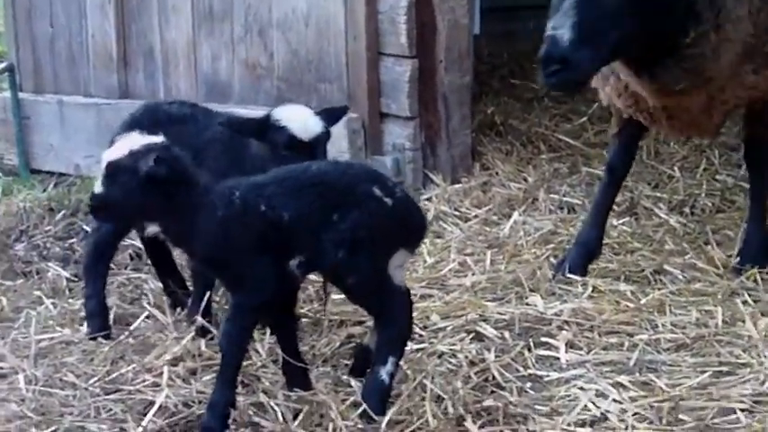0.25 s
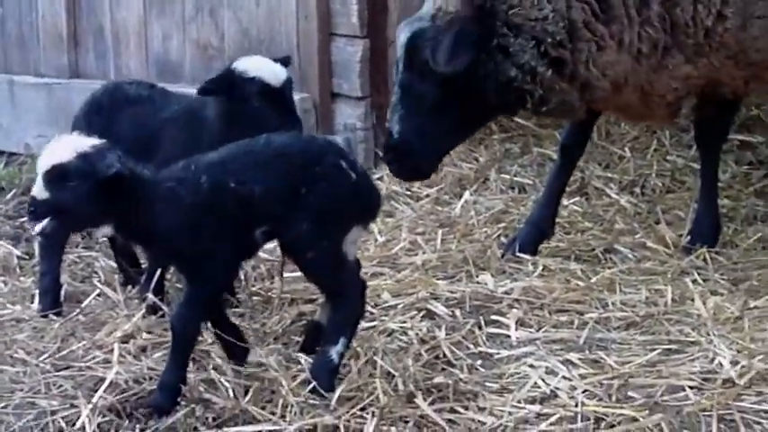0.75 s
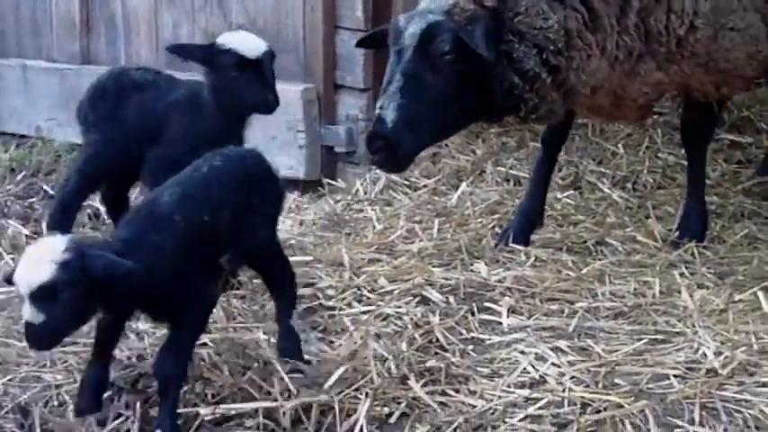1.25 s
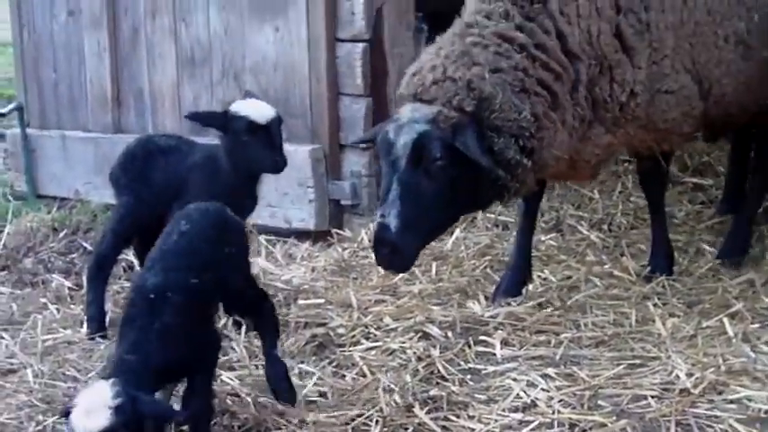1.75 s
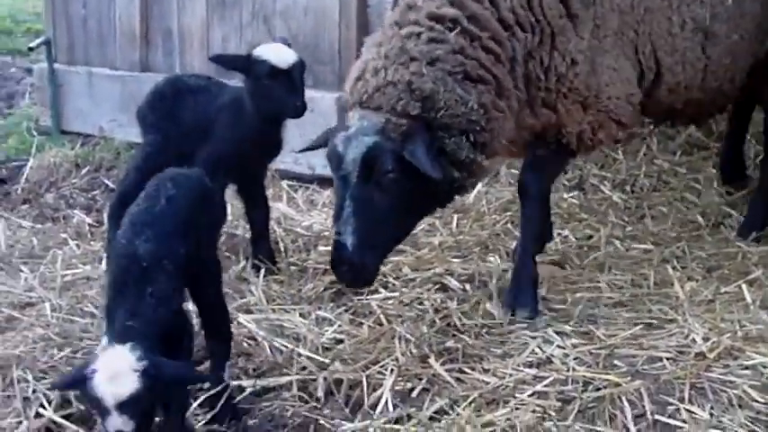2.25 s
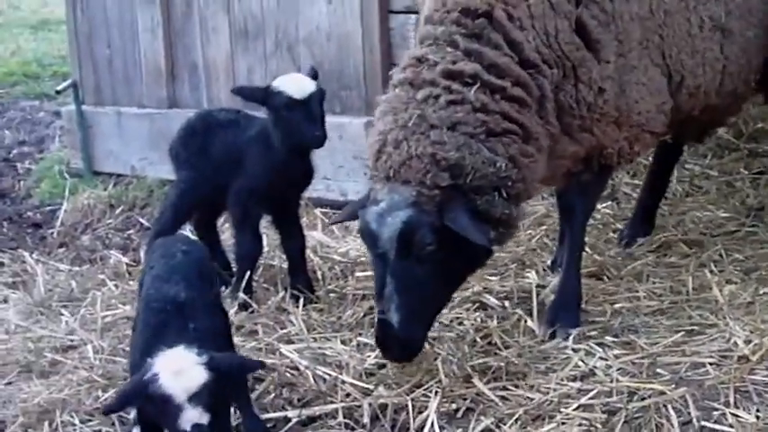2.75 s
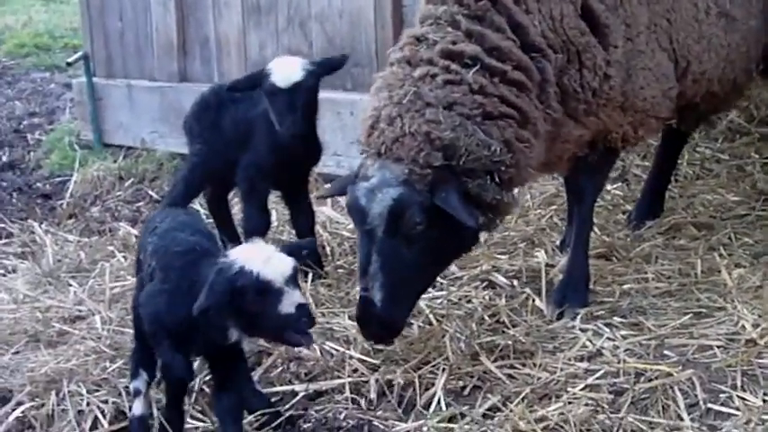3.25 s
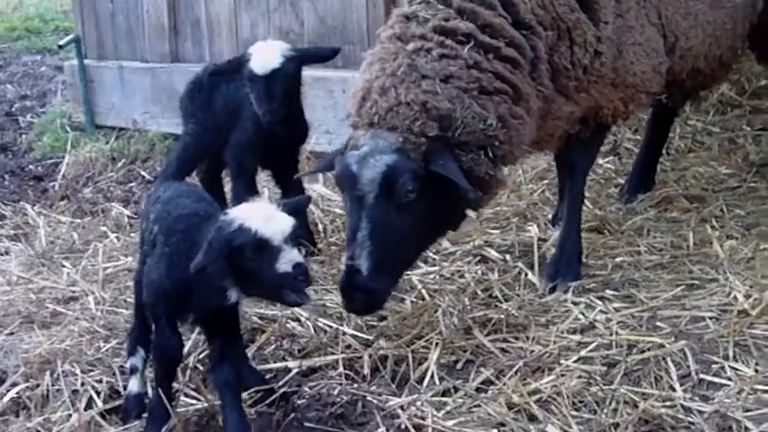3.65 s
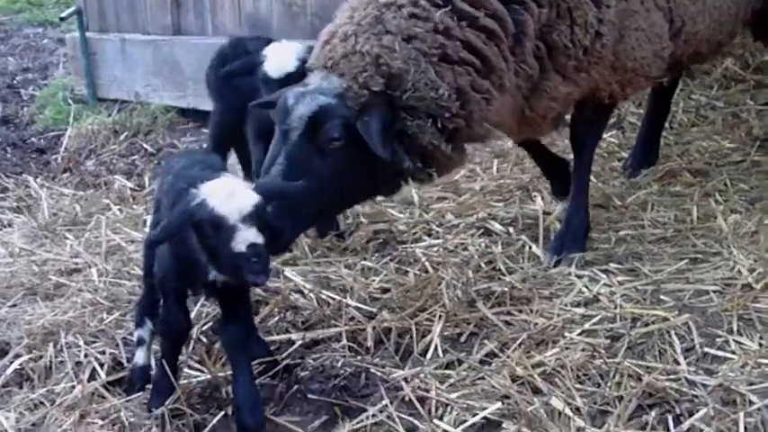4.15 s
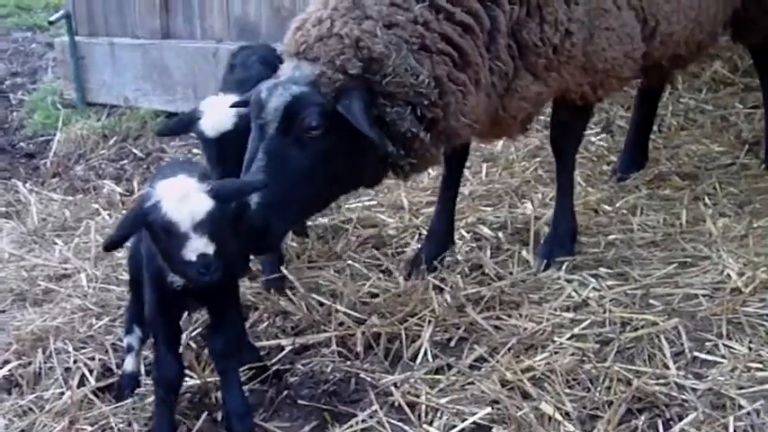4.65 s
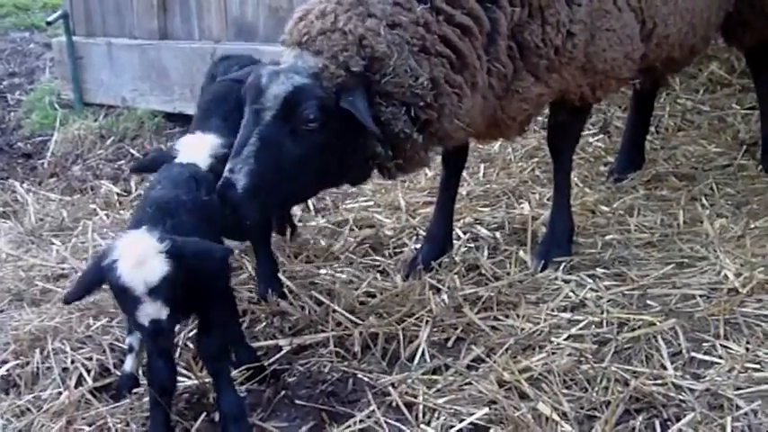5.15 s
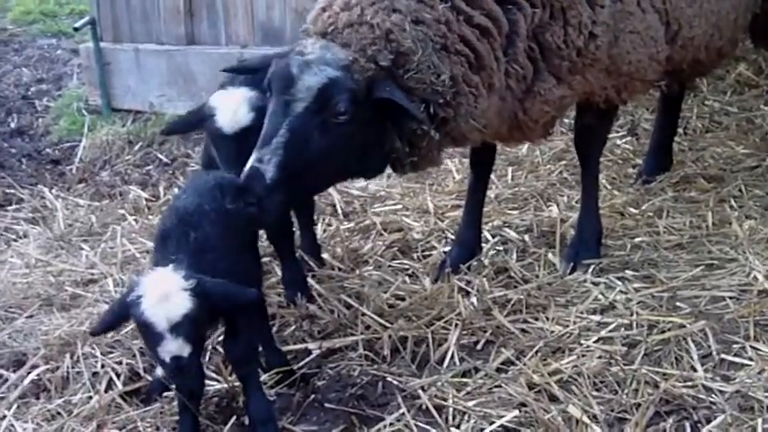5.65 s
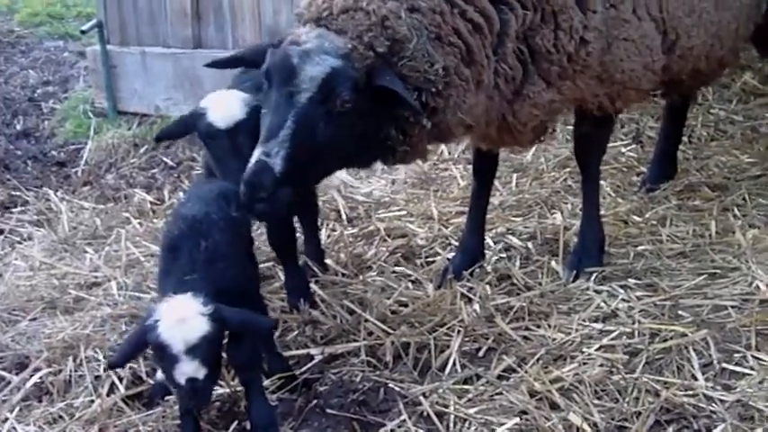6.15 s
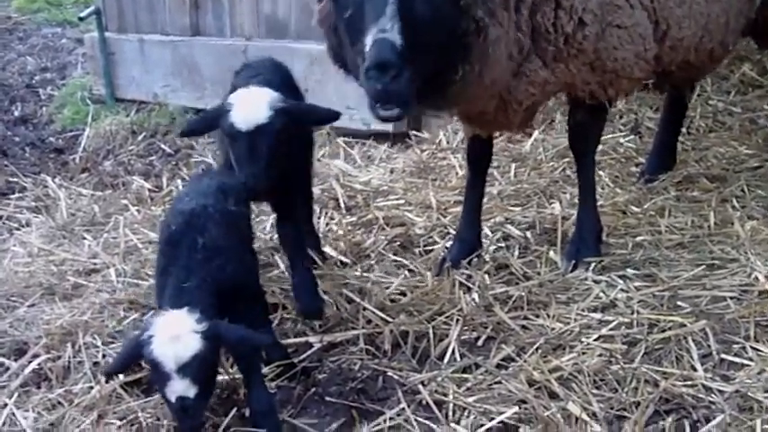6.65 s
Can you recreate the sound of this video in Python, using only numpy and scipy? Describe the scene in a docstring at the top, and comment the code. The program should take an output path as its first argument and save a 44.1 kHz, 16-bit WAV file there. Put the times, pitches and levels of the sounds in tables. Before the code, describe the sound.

A quiet open-air straw yard, heard close up, with faint air noise and low wind rumbling on the microphone. From about 0.2 s a small bird farther off sings, very faint at first, then clearer from 1.1 s: a high whistle followed by a rapid buzz, repeated until about 2.75 s and again from 3.7 to 4.5 s. At 0.6 s a lamb gives a short, soft, nasal bleat, ending near 1.05 s; the ewe answers at once with a low, fluttering, closed-mouth rumble until 1.65 s. Hooves rustle and snap straw from 0.95 to 2.5 s. At 2.7 s the lamb bleats loudly, high and bright, weakening and sagging until 4.15 s. A wind gust swells near 3.2 s, and dull hoof knocks fall around 3.4 and 3.7 s. The ewe rumbles briefly at 3.9-4.25 s. Until nearly 7 s, straw crackles, sharp stalk snaps, especially around 5.5 and 6.2 s, and faint bumps continue.

```python
"""Lamb and ewe in a straw yard

A newborn lamb bleats twice by a barn door, short then long: summed overtones shaped by the opening mouth.
The ewe answers each with a closed-mouth rumble, fluttering pulses through resonances of nose and throat.
A small bird repeats a two-note song, a whistle and then a buzz made by fast pitch warble.
Hooves rustle, snap and knock as coloured noise and clicks; light wind rumbles on the microphone."""
import sys
import numpy as np
from scipy import signal
from scipy.fft import rfft, irfft
from scipy.io import wavfile
from scipy.ndimage import uniform_filter1d, map_coordinates

SR = 44100
rng = np.random.default_rng(int(sys.argv[2]) if len(sys.argv) > 2 else 0)


def to_wav(sig):
    """Store sig (one row per channel, or 1-D mono) as 16-bit WAV at the path in sys.argv[1].

    Samples outside -1..1 are clipped; the rate is SR.
    """
    pcm = np.clip(np.atleast_2d(sig), -1, 1) * 32767
    pcm = np.round(pcm).astype(np.int16)
    wavfile.write(sys.argv[1], SR, pcm.T)  # frames by channels


N = 304290
TIME = np.arange(N) / SR


def amp(db):
    """Decibels to gain."""
    return 10 ** (np.asarray(db) / 20)


def evened(x):
    """Scales to an rms of one."""
    return x / np.sqrt(np.mean(x ** 2) + 1e-20)


def read(points, hz):
    """Reads a spectrum on a log-frequency axis."""
    f, value = np.transpose(points)
    return np.interp(np.log(hz + 1), np.log(f + 1), value)


def curves(rows, t):
    """Reads every column of a table at the times t."""
    s, *columns = np.transpose(rows)
    return [np.interp(t, s, c) for c in columns]


def add(mix, s, sound):
    """Mixes a sound in at time s."""
    part = mix[max(round(s * SR), 0):][:len(sound)]
    part += sound[:len(part)]


def colour(x, points):
    """Gives a signal a spectrum, at rms one."""
    size = x.shape[-1]
    gain = amp(read(points, np.fft.rfftfreq(size, 1 / SR)))
    return evened(irfft(rfft(x) * gain, size))


def drift(t, rate):
    """Smooth chance that turns about rate times a second."""
    knots = rng.standard_normal(4096)
    return map_coordinates(knots, [(t - t[0]) * rate], order=2, mode="wrap")


def resonate(x, hz, width_hz):
    """A resonance passed twice, for steep skirts."""
    b, a = signal.iirpeak(hz, hz / width_hz, SR)
    return signal.lfilter(b, a, signal.lfilter(b, a, x))


def bleat(pitch, effort, start, end, scoop, swell_db, swell_s, jitter, rasp_db, fizz_db,
          waver=0.0015, shimmer=0.045, fade_db=4.5):
    """Clean overtones of the vocal folds in an opening throat, with a little air puffed at each cycle."""
    # Throat colour at three mouth openings. Each row: frequency in Hz, level in dB.
    half_open = [(460, -26.5), (930, -12.5), (1400, -5), (1850, -7.5), (2330, -26.5), (2800, -12),
                 (3750, -8.5), (4200, -10), (5550, -11.5), (6100, -21.5), (7000, -12), (7600, -30),
                 (10600, -36.5), (12200, -38), (15000, -47)]
    fully_open = [(470, -27), (940, -9.5), (1420, 5), (1880, -6.5), (2350, 1), (2830, -25), (3300, -6),
                  (3800, -3), (4900, -6), (6100, -17.5), (7000, -20.5), (8000, -26.5), (12000, -33),
                  (15000, -43)]
    wide_open = [(500, -35), (1010, -25), (1510, 1), (2020, -27), (2520, -14), (3030, -10.5), (3520, -4),
                 (4040, -19.5), (4540, -5.5), (5500, -14.5), (6100, -25.5), (7000, -24), (7700, -33.5),
                 (9300, -28.5), (15000, -46)]
    # Mouth opening. Each row: time in seconds, pose (0 half open, 1 open, 2 wide open).
    mouth_poses = [(0.68, 0.19), (0.82, 0.5), (1.05, 0.12), (2.7, 1.02), (2.88, 2.0), (3.25, 1.82),
                   (3.32, 1.3), (3.5, 0.93), (4.15, 1.04)]
    scoop_s = 0.042  # time constant of the slide up to pitch
    let_go_s, drop_share, drop_db = 0.012, 0.14, 12.5  # pitch and level lost as the call is cut off

    t = np.arange(start, end, 1 / SR)
    held_hz, = curves(pitch, t)
    mouth, = curves(mouth_poses, t)
    held_db, ring_db, edge_db = curves(effort, t)

    # the voice scoops up and swells, holds, then drops
    let_go = np.exp((t - end) / let_go_s)
    hz = held_hz * (1 - scoop * np.exp((start - t) / scoop_s) - drop_share * let_go)
    body_db = held_db - swell_db * np.exp((start - t) / swell_s) - drop_db * let_go

    # the folds are unsteady as they start and stop
    loose = 1 + 7 * np.exp(-(t - t[0]) / 0.05) + 9 * np.exp(-(t[-1] - t) / 0.019)
    unsteady_hz = hz * (1 + waver * drift(t, 70) + jitter * loose * drift(t, 260))
    turns = np.cumsum(unsteady_hz) / SR

    shares = [np.maximum(1 - abs(np.clip(mouth, 0, 2) - pose), 0) for pose in range(3)]
    throats = (half_open, fully_open, wide_open)
    # three registers: body, ring of the upper throat, sharp edge
    waves, powers = np.zeros((2, 3, len(t)))
    for k in np.arange(1, 36):
        f = k * hz
        db = sum(share * read(throat, f) for share, throat in zip(shares, throats))
        # the high overtones swell and fade as the head moves
        gain = amp(db + fade_db * np.minimum(f / 5500, 1) ** 1.2 * drift(t, 18))
        # each throat resonance holds back the overtones above it
        lag = sum(np.arctan((f - centre_hz) / 220) for centre_hz in (1450, 2420, 3780, 4700))
        above_body = np.clip((f - 2550) / 200, 0, 1)
        above_ring = np.clip((f - 5900) / 600, 0, 1)
        register = np.array([1 - above_body, above_body - above_ring, above_ring])
        waves += register * gain * np.cos(2 * np.pi * k * turns - lag)
        powers += register * gain ** 2 / 2
    levels = amp([body_db, body_db + ring_db, body_db + edge_db])
    voice = (levels * waves / np.sqrt(powers)).sum(0) * (1 + shimmer * drift(t, 43))

    # air hisses through the upper throat and fizzes at the lips
    puffs = rng.standard_normal(len(t)) * (0.4 + np.exp(-(turns % 1) / 0.3))
    rasp_colour = [(1500, -26.5), (3000, -22.5), (4300, 6), (5400, -1.0), (6500, -17)]
    fizz_colour = [(3000, -31.5), (6500, 0.0), (9000, -7.5), (12000, -8), (15000, -23.0)]
    rasp = amp(rasp_db) * levels[1] * colour(puffs, rasp_colour)
    fizz = amp(fizz_db) * levels[2] * colour(puffs, fizz_colour)
    call = voice + np.sqrt(loose) * (rasp + fizz)
    return start, call * signal.windows.tukey(len(t), 0.011 / (end - start))


def bleats():
    """The lamb's voice: a short bleat turned away, then a long one facing the microphone."""
    # Pitch held: a low arch, then held and sagging. Each row: time in seconds, pitch in Hz.
    short_pitch = [(0.74, 470.7), (0.842, 467), (0.928, 457.4), (1.02, 425.6)]
    long_pitch = [(2.85, 502), (3.106, 506.4), (3.246, 501.6), (3.308, 486.5), (3.48, 475.3),
                  (3.526, 484.2), (3.582, 466.9), (3.702, 471.6), (3.736, 464.3), (3.842, 469),
                  (3.99, 456.8), (4.11, 452.7)]
    # Effort held. Each row: time in seconds, body level in dB, ring of the upper throat in dB over body,
    # sharp edge in dB over body.
    short_hold = [(0.67, -39.5, -1, -20), (0.746, -39, 9.5, -8.5), (0.844, -35.5, 4.5, -9),
                  (0.91, -38, 9, -12), (1.02, -37, 1.5, -11.5)]
    long_hold = [(2.85, -18.5, 2.5, -13.5), (2.936, -18, 4.5, -15.5), (3.046, -18, -1.5, -16.5),
                 (3.238, -17.5, 0.5, -21), (3.292, -21, -1.5, -18.5), (3.386, -26, 5.5, -14),
                 (3.498, -26, 3.5, -11.5), (3.53, -23.5, 0.5, -18), (3.554, -26, 4.5, -13),
                 (3.74, -25.5, 2, -13.5), (4.11, -30.5, 6, -10.5)]
    # Each row: start and end in seconds, scoop from below as a share of pitch, swell in dB,
    # swell time constant in seconds, base jitter as a share of pitch, base rasp in dB over ring,
    # base fizz in dB over edge.
    calls = [(0.597, 1.052, 0.21, 26.5, 0.025, 0.0021, -24, -11),
             (2.708, 4.155, .23, 32, 0.054, .0008, -33, -21.5)]
    out = np.zeros(N)
    for pitch, effort, row in zip((short_pitch, long_pitch), (short_hold, long_hold), calls):
        add(out, *bleat(pitch, effort, *row))
    return out


def rumble(start, end, first_hz, last_hz, hum_db, swell_db, swell_s, rasp_db, jitter=0.06, breathy=0.058):
    """Fluttering pulses hum in the ewe's nose and rasp in her throat; the flutter smooths out."""
    # Resonances. Each row: frequency in Hz, width in Hz, gain in dB.
    nose = [(190.6, 71, 14.5), (340, 320, -8.5), (593, 53, -12)]
    ewe_throat = [(1047, 390, 14), (1265, 360, 14), (1440, 88, 13), (2210, 121, -43)]
    # Flutter depth at the start and at the end, as a share: deep, then nearly smooth.
    flutter_depths = (0.93, .25)
    flutter_per_s, slowing_per_s2 = 42, 12.5  # first rate, and the rate lost each second

    t = np.arange(start, end, 1 / SR)
    age = t - start
    u = age / (end - start)
    hz = first_hz + (last_hz - first_hz) * u
    level_db = hum_db - swell_db * np.maximum(1 - age / swell_s, 0)
    depth = np.interp(u, [0, 1], flutter_depths)
    turns = np.cumsum(hz * (1 + jitter * (0.25 + depth) * drift(t, 150))) / SR
    flutter_rate = (flutter_per_s - slowing_per_s2 * age) * (1 + 0.042 * drift(t, 16.7))
    flutter = depth * np.cos(2 * np.pi * np.cumsum(flutter_rate) / SR)
    pulses = np.diff(np.floor(turns), prepend=0)
    air = breathy * (0.78 + depth) * np.exp(-(turns % 1) / 0.58) * rng.standard_normal(len(t))
    # the flutter chops both the hum and the rasp
    hum_source = (pulses + air) * (1 + flutter)
    rasp_source = (pulses + 2 * air) * (1 + flutter)
    hum = evened(sum(amp(db) * resonate(hum_source, f, w) for f, w, db in nose))
    rasp = evened(sum(amp(db) * resonate(rasp_source, f, w) for f, w, db in ewe_throat))
    return start, amp(level_db) * (hum + amp(rasp_db) * rasp) * signal.windows.tukey(len(t), 0.1)


def rumbles():
    """The ewe's low calls: one follows the short bleat, one overlaps the end of the long bleat."""
    # Each row: start and end in seconds, first and last pitch in Hz, nasal hum in dB, swell in dB,
    # swell time in seconds, throat rasp in dB over hum.
    calls = [(1.054, 1.658, 167.5, 124.5, -39.5, 13.5, 0.23, -9),
             (3.901, 4.249, 120.1, 151.6, -38.5, 16, 0.24, -8.5)]
    out = np.zeros(N)
    for row in calls:
        add(out, *rumble(*row))
    return out


def note(length_s, pitch, swing_hz, softness, buzz_hz=228, tremble=0.38, unsteady=0.05):
    """One bird note along a pitch shape; a wide fast warble, widening as it swells, makes it a buzz."""
    t = np.arange(0, length_s, 1 / SR)
    u = t / length_s
    arch = np.sin(np.pi * u ** 0.9).clip(0) ** softness
    hz = pitch(u) + (20 + 0.22 * swing_hz) * drift(t, 110)
    warble = arch * np.sin(2 * np.pi * np.cumsum(buzz_hz * (1 + unsteady * drift(t, 54))) / SR)
    tone = np.sin(2 * np.pi * np.cumsum(hz + swing_hz * warble) / SR)
    return np.sqrt(2) * arch * (1 + tremble * drift(t, 83)) * tone


def bird():
    """Whistles that dip in pitch take turns with rising buzzes, each led in by a falling chip."""
    # Each row: start in seconds, mid pitch in Hz, glide from start to end in Hz, level in dB.
    whistles = [(0.19, 3580, 222, -63.5), (1.075, 5460, -130, -48.5), (1.52, 5470, -66, -46),
                (1.976, 5400, -34, -39.5), (2.445, 5430, -10, -47), (3.71, 5480, -100, -39),
                (4.156, 5390, -220, -46.5)]
    # Each row: start in seconds, mid pitch in Hz, level in dB.
    buzzes = [(0.375, 4340, -62.5), (1.27, 4240, -43.5), (1.713, 4280, -41), (2.172, 4245, -43),
              (2.635, 4210, -41.5), (3.89, 4235, -43), (4.338, 4265, -42)]
    whistle_s, dip_hz = 0.122, 129.8  # the pitch sags this far in the middle
    buzz_s, buzz_rise_hz, buzz_swing_hz = 0.116, 80, 205
    chip_hz, chip_fall_hz, chip_s = 6000, 170, 0.02
    chip_lead_s, chip_db = 0.009, -15.5  # ahead of its buzz; level over the buzz
    out = np.zeros(N)
    for s, hz, glide_hz, db in whistles:
        whistle = note(whistle_s, lambda u: hz + glide_hz * (u - 0.5) + dip_hz * (2 * u - 1) ** 2,
                       swing_hz=12, softness=0.46)
        add(out, s, amp(db) * whistle)
    for s, hz, db in buzzes:
        chip = note(chip_s, lambda u: chip_hz - chip_fall_hz * (u - 0.5), swing_hz=90, softness=0.6)
        add(out, s - chip_lead_s, amp(db + chip_db) * chip)
        buzz = note(buzz_s, lambda u: hz + buzz_rise_hz * (u - 0.5), buzz_swing_hz, softness=0.6)
        add(out, s, amp(db) * buzz)
    return out


def crackle(size, per_s, spread_db, hiss):
    """Tiny clicks of very unequal size over the hiss of stalks sliding."""
    struck = rng.random(size) < per_s / SR
    sizes = amp(spread_db * np.minimum(rng.exponential(1, size), 4))
    clicks = struck * sizes * rng.choice([-1, 1], size)
    return evened(evened(clicks) + hiss * rng.standard_normal(size))


def stir():
    """How hard hooves stir the straw: each step builds quickly and dies away."""
    # Each row: peak time in seconds, relative level in dB, time constant of the decay in seconds.
    hoof_steps = [(0.0, -62, 0.042), (0.95, -56, .15), (1.3, -53, 0.17), (1.63, -56, 0.13),
                  (1.85, -56, 0.064), (2.07, -59, 0.086), (2.27, -51.5, 0.2), (2.47, -62.5, 0.073),
                  (4.22, -59.5, 0.16), (4.48, -57, .05), (5.13, -60.5, .12), (5.32, -58.5, .06),
                  (5.62, -56.5, 0.16), (6.42, -60.5, 0.19)]
    rise_s, idle_db = 0.066, -74.5  # a hoof sinks in; the straw never quite rests
    power = amp(idle_db) ** 2
    for s, db, fade_s in hoof_steps:
        age = TIME - s
        fall = np.where(age < 0, (age / rise_s) ** 2, age / fade_s)
        power = power + (amp(db) * np.exp(-fall)) ** 2
    return np.sqrt(power)


def rustle(trim_db=3.5):
    """Clumps of crackle under the hooves."""
    # Each row: frequency in Hz, level in dB.
    straw_colour = [(290, -41.5), (500, -13.5), (1030, -15.5), (2160, -8.5), (3380, -6.5), (4380, -9.5),
                    (4770, -7.5), (9370, -7.5), (11800, -9.5), (15500, -17.5)]
    clumps_db = 1.9 * drift(TIME, 55)
    return colour(crackle(N, 2200, 2.8, 0.85), straw_colour) * stir() * amp(trim_db + clumps_db)


def snaps(trim_db=-7, crack=0.68):
    """A stalk that breaks cracks, then splinters."""
    # Each row: time in seconds, relative peak in dB, relative 1-4 kHz share in dB, crackle length in seconds.
    breaks = [(0.562, -48, -14, 0.017), (1.166, -42, -18.5, 0.027), (1.185, -37.5, -15, 0.03),
              (1.247, -46, -13, .025), (1.85, -41, -21, 0.14), (2.085, -42, -16, 0.037),
              (4.505, -35.5, -14.5, 0.014), (4.995, -48, -10.5, .04), (5.356, -42.5, -17, .04),
              (5.471, -37, -18.5, 0.11), (5.588, -37, -9.5, 0.03), (5.984, -46.5, -28, 0.019),
              (6.187, -41.5, -13.5, 0.053), (6.235, -32.5, -15, 0.08), (6.41, -41.5, -17, 0.046),
              (6.715, -48.5, -1.5, 0.038)]
    lead = 256  # samples of silence ahead of the crack
    out, t = np.zeros(N), np.arange(8192) / SR
    for s, db, low_db, length_s in breaks:
        decay = np.exp(-2 * t / max(length_s, 0.003)) + crack * np.exp(-t / 0.0009)
        splinters = crackle(len(t), 2500, 1.8, 0.16) * decay
        snap_colour = [(300, low_db + 5.5), (1500, low_db + 8.5), (3500, low_db + 12.5),
                       (6500, -1.5), (9500, -1.5), (15000, -10.5)]
        snap = colour(np.pad(splinters, (lead, 0)), snap_colour)
        loudest = np.sqrt(uniform_filter1d(snap ** 2, size=128).max())
        add(out, s - lead / SR, amp(db + trim_db) * snap / loudest)
    return out


def knocks(decay_s=0.0058):
    """Hooves bump the packed ground with a short dull ring."""
    # Each row: time in seconds, relative level in dB, ring in Hz.
    bumps = [(3.445, -47, 516), (3.676, -52, 297), (4.441, -57, 260), (5.391, -50, 576),
             (6.116, -57.5, 847), (6.725, -61, 710)]
    out, t = np.zeros(N), np.arange(4096) / SR
    for s, db, hz in bumps:
        thud = resonate(rng.standard_normal(len(t)) * np.exp(-t / decay_s), hz, hz * 0.69)
        add(out, s, 2 * amp(db) * thud / abs(thud).max())
    return out


def wind():
    """Lumpy low rumble on the microphone that rises and falls with each gust."""
    # Each row: frequency in Hz, level in dB.
    wind_colour = [(8.8, -34), (15, 7), (23, -5), (38, -4), (50, -12.5), (60, -17.5), (107, -25),
                   (140, -34), (177, -32), (300, -48.5), (390, -66.5), (660, -120)]
    # Each row: peak time in seconds, level in dB over the breeze.
    gusts = [(1.1, 3), (1.95, 4), (2.5, 1.5), (3.17, 7.5), (5.67, 3), (6.25, 4)]
    breeze_db, gust_s = -43.5, 0.074  # gust_s: time a gust takes to build
    lumps = colour(rng.standard_normal(N), wind_colour)
    lumps /= np.sqrt(uniform_filter1d(lumps ** 2, size=6000))
    gust_db = sum(db * np.exp(-((TIME - s) / gust_s) ** 2) for s, db in gusts)
    return amp(breeze_db + gust_db) * lumps


def open_air(level_db=-62.5):
    """Steady noise of the air, strongest in the low range."""
    # Each row: frequency in Hz, level in dB.
    air_colour = [(88, -37), (150, -1.5), (781, -12.5), (1090, -12), (3910, -19), (4220, -19), (7130, -25),
                  (8010, -25), (12500, -29.5), (14100, -32.5), (15500, -48)]
    return amp(level_db) * colour(rng.standard_normal(N), air_colour)


def yard(x, t60_s):
    """Scattered echoes from the barn and trees: a decaying noise tail."""
    t = np.arange(SR // 2) / SR
    tail = rng.standard_normal(len(t)) * amp(-60 * t / t60_s) * np.minimum(t / 0.072, 1)
    return signal.fftconvolve(x, tail / np.linalg.norm(tail))[:N]


def spread(a, b):
    """Two unrelated signals become a pair that is alike in the bass and wide in the treble."""
    # Each row: frequency in Hz, left-right likeness (1 identical).
    likeness = [(1500, 1), (3000, 1), (5000, 0.72), (8000, .5), (12000, .3)]
    same = np.clip(read(likeness, np.fft.rfftfreq(N, 1 / SR)), -0.5, 1)
    side = irfft(rfft(b) * np.sqrt((1 - same) / (1 + same)), N)
    return np.array([a + side, a - side])


def scene(lamb_wet_db=-27.5, bird_wet_db=-12.0):
    """The sheep stand close and dry; the bird is farther off."""
    lamb, ewe, song = bleats(), rumbles(), bird()
    around = []
    for _ in range(2):
        echoes = amp(lamb_wet_db) * yard(lamb, t60_s=0.3) + amp(bird_wet_db) * yard(song, t60_s=0.4)
        around.append(rustle() + snaps() + open_air() + echoes)
    # the lamb's voice reaches the right microphone port one sample before the left
    ports = np.array([np.roll(lamb, 1), lamb])
    return spread(*around) + ports + ewe + song + knocks() + wind()


def record(dry):
    """A narrow dip in the microphone's treble, then an upper band limit."""
    notch_hz, notch_width_hz, edge_hz = 11100, 170, 15450
    b, a = signal.iirnotch(notch_hz, notch_hz / notch_width_hz, SR)
    heard = signal.lfilter(b, a, dry)
    low_pass = signal.firwin(511, edge_hz, window=("kaiser", 9), fs=SR)
    return signal.oaconvolve(heard, low_pass[None], "same")


dry = scene()
out = record(dry)
to_wav(out)
```